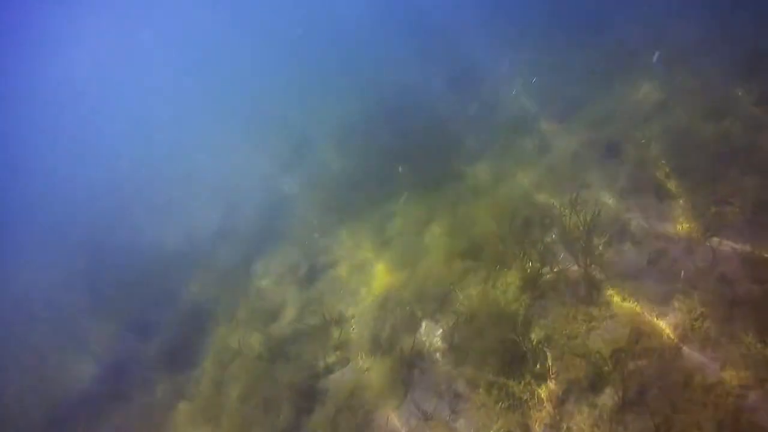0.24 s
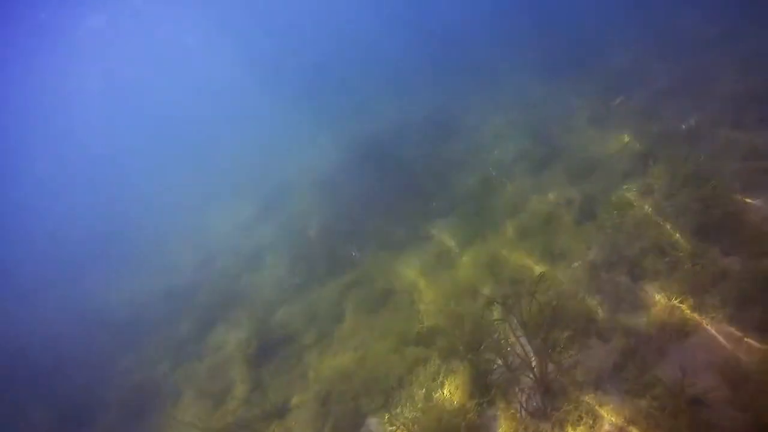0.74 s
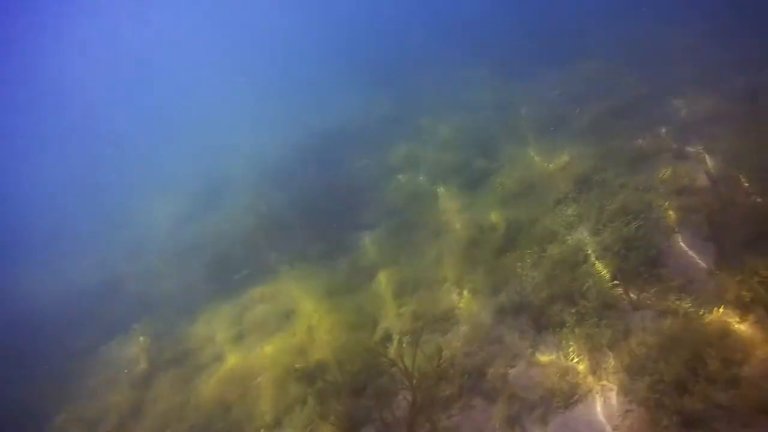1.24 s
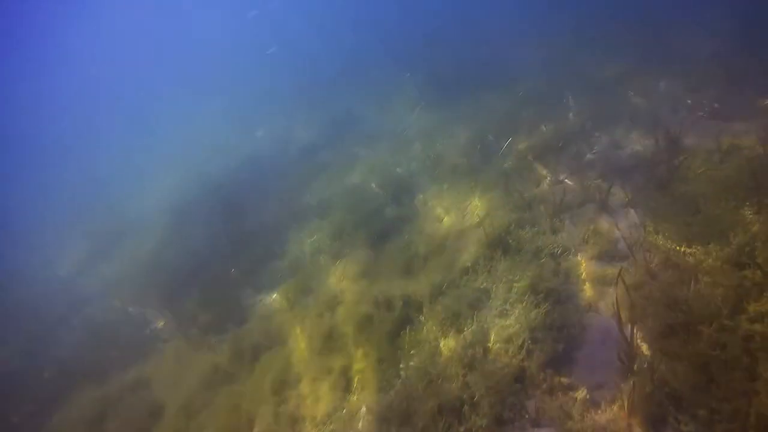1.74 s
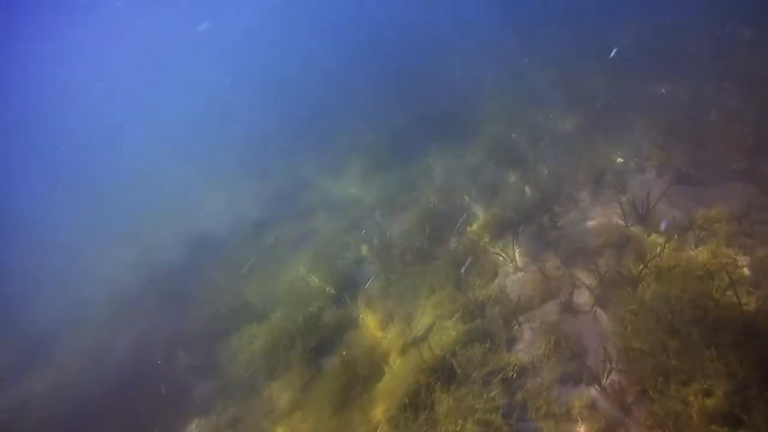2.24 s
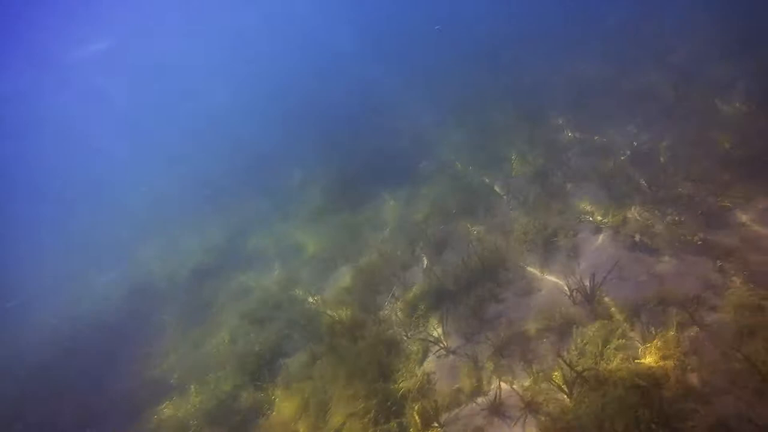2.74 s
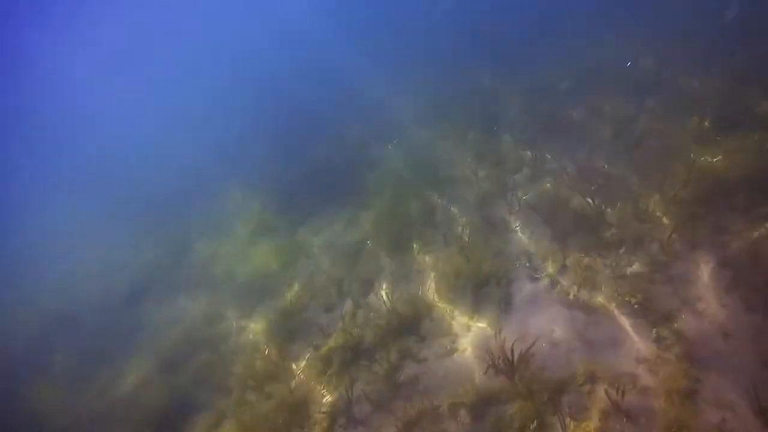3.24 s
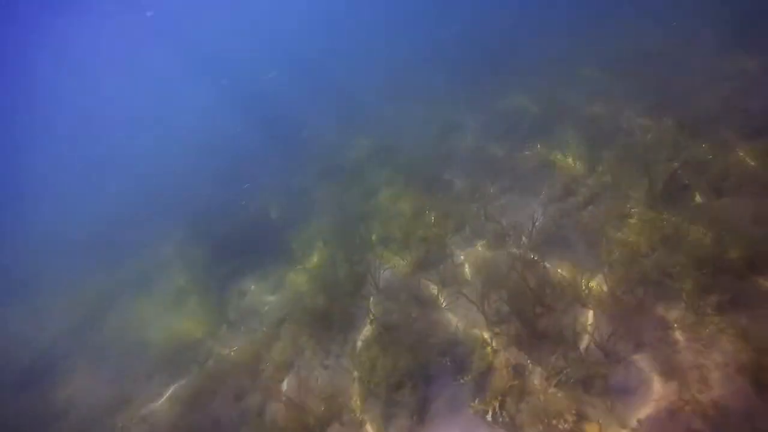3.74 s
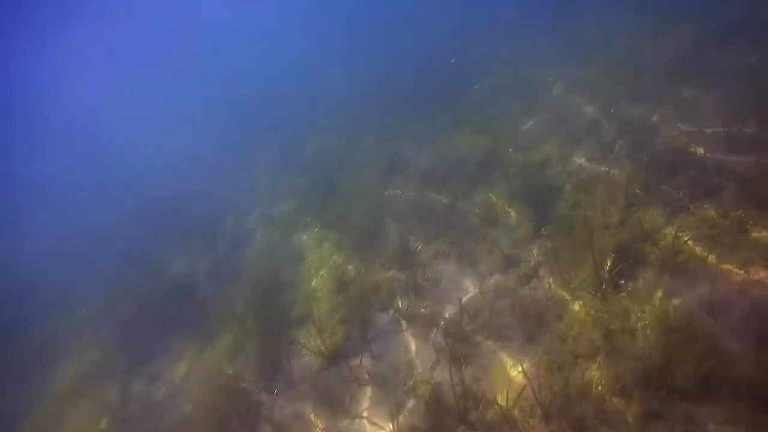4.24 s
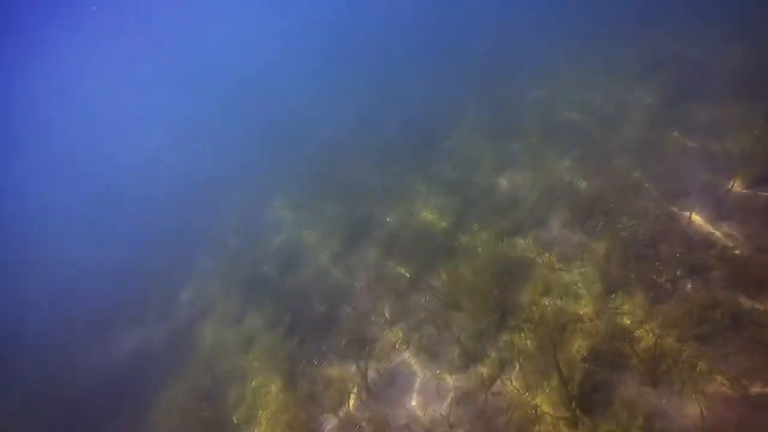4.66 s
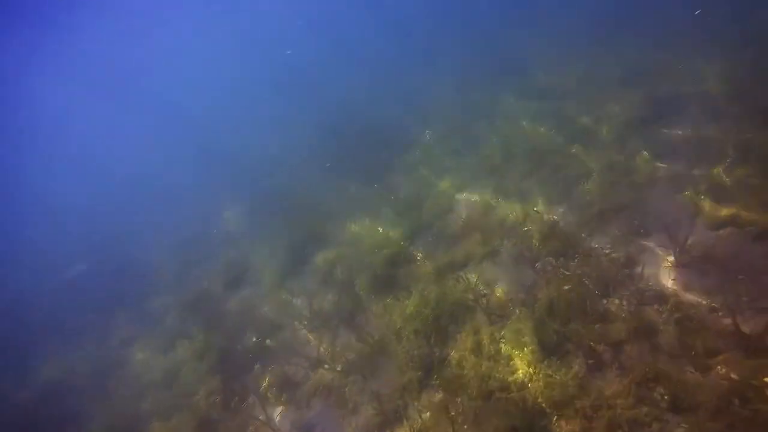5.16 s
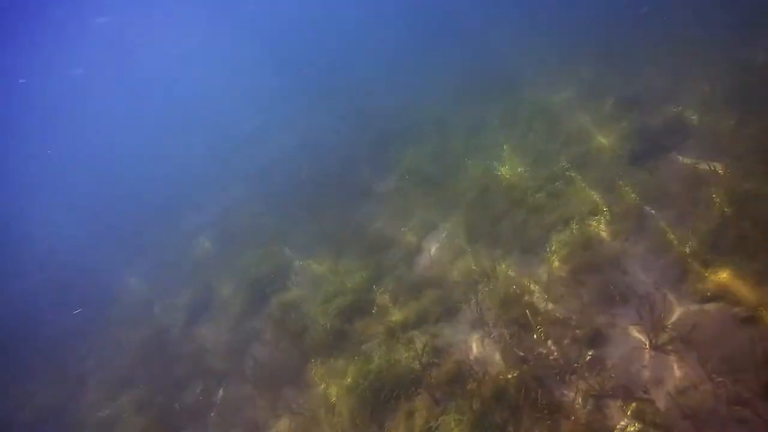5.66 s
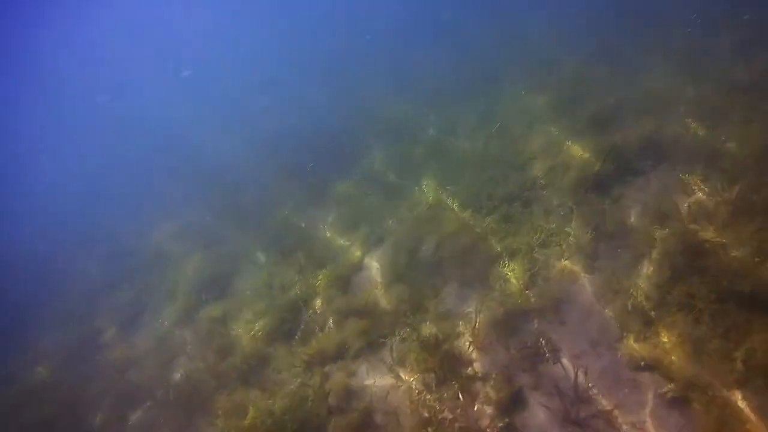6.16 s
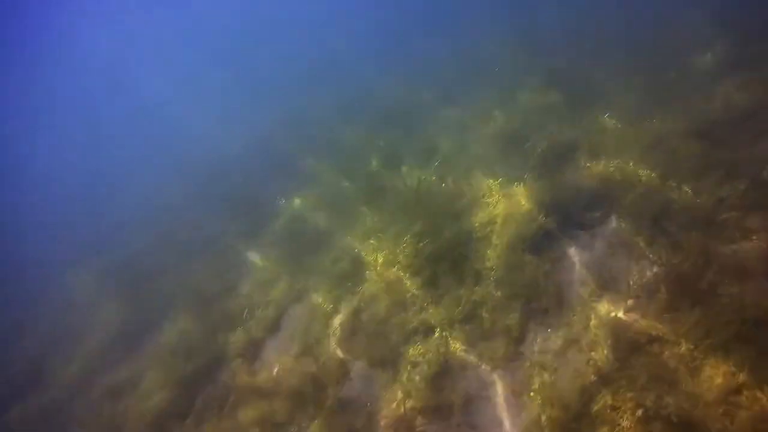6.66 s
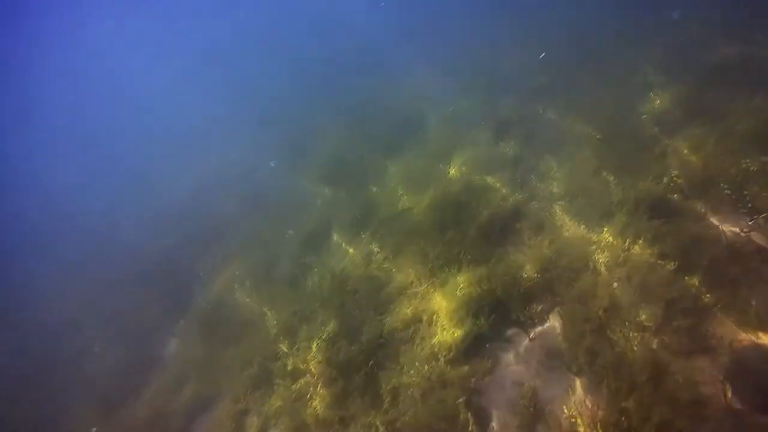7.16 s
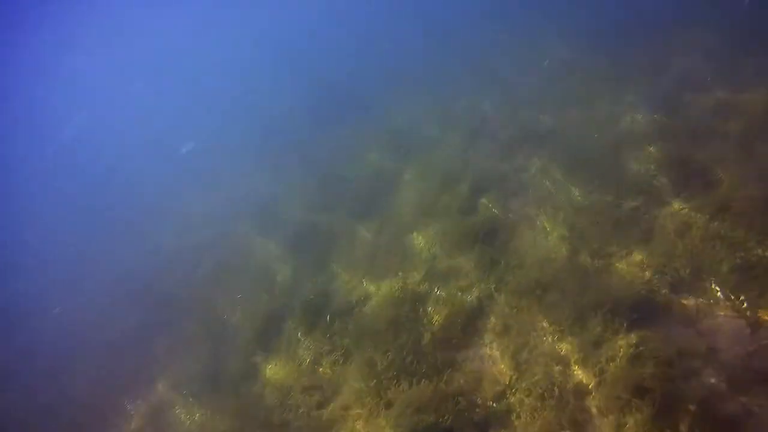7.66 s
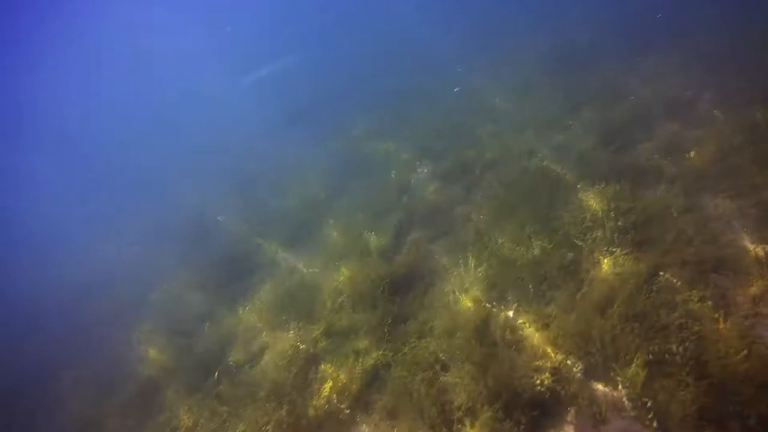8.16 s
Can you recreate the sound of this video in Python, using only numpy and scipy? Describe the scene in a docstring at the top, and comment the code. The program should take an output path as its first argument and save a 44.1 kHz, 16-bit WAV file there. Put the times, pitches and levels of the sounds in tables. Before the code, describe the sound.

Underwater glide: irregular hollow bubble pops and gurgling rush against a closed case, over deep rumble, with scattered soft thumps from the mount.

```python
"""Bubbles burst along the sealed housing of a camera towed under water on a pole below a gliding kayak.
Clear bubbles are single decaying tones, the stream is random births ringing through the case resonances.
Eddies shake pole and mount into a low hum of wandering sine and resonant noise; blows ring both as knocks.
Grit or tiny bubbles tick on the case; the sealed microphone adds a faint noise hiss and two sine whines."""
import sys
import numpy as np
from scipy import signal
from scipy.io import wavfile

SR = 44100
rng = np.random.default_rng(int(sys.argv[2]) if len(sys.argv) > 2 else 0)


def master(y):
    """Save y as 16-bit WAV."""
    cut = np.clip(np.atleast_2d(y).T, -1, 1)
    pcm = np.round(cut * 32767)  # scale
    wavfile.write(sys.argv[1], SR, pcm.astype(np.int16))


N = 370426

# sway of the pole: its one mode
POLE_HZ, POLE_WIDTH_HZ = 29.9, 16.6
# rattle modes of the mount: (frequency [Hz], width [Hz], level [dB])
MOUNT_MODES = [(61.3, 32, -15), (84.7, 17.1, 2.5), (123.2, 21, 4), (144.4, 80, -8.5), (213, 54, -12.5)]
# resonances of housing walls and air pocket: (frequency [Hz], width [Hz], level [dB])
HOUSING_MODES = [(300, 310, -21.5), (410, 37, -9), (510, 48.7, -9), (626, 58.3, -1.5), (931.4, 53.4, -7.5),
                 (1090, 46, -8), (1440, 248, -10.5), (1792, 293, -13.5), (2430, 160, -25),
                 (3050, 540, -26.5), (3810, 1020, -37), (4100, 240, -57.5), (6640, 5000, -48.5),
                 (9050, 3000, -79.5), (12000, 3000, -77.5)]
# clear bubbles: (time [s], level [dB], starting pitch [Hz], 60 dB decay time [ms])
CLEAR_BUBBLES = [(0.03, -22.5, 525, 23), (0.1, -24, 1490, 17), (0.108, -25, 1090, 16),
                 (0.046, -30.5, 410, 42), (0.116, -27, 1390, 120), (0.275, -27.5, 1445, 46),
                 (0.312, -18.5, 627, 69), (0.386, -18.5, 643, 100), (0.404, -19.5, 623, 90),
                 (0.409, -35, 2240, 33), (0.411, -22, 1454, 35), (0.533, -16.5, 1603, 50),
                 (0.592, -40, 3350, 28), (0.609, -21.5, 592, 16), (0.707, -23, 610, 21),
                 (0.812, -20.5, 649, 65), (0.837, -35.5, 2340, 14), (0.926, -44, 3760, 20),
                 (0.929, -18, 582, 194), (0.929, -10, 1501, 37), (0.944, -19.5, 628, 28),
                 (0.946, -11, 1435, 27), (0.967, -40, 3820, 15), (0.967, -24, 638, 150),
                 (1.016, -38, 3420, 13), (1.019, -28, 1460, 18), (1.038, -42, 4630, 8.9),
                 (1.104, -25, 1760, 8.1), (1.138, -26, 620, 29), (1.14, -25.5, 1390, 21),
                 (1.159, -22, 660, 36), (1.193, -16.5, 656, 57), (1.204, -15.5, 1082, 60),
                 (1.204, -28.5, 2950, 20), (1.226, -36, 2880, 14), (1.282, -33, 3170, 19),
                 (1.401, -26, 1875, 23), (1.472, -21.5, 514, 50), (1.483, -28, 410, 180),
                 (1.533, -33.5, 2420, 33), (1.558, -20.5, 1486, 44), (1.609, -27, 366, 140),
                 (1.627, -30.5, 300, 46), (1.629, -19.5, 1447, 48), (1.678, -29, 1330, 26),
                 (1.713, -29, 339.6, 290), (1.717, -17.5, 634, 44), (1.786, -20.5, 1520, 32),
                 (1.789, -22, 570, 48), (1.828, -24.5, 1190, 23), (1.833, -26, 549, 170),
                 (1.956, -27.5, 544, 230), (1.962, -23, 1090, 57), (2.102, -26, 1654, 62),
                 (2.161, -23.5, 1490, 23), (2.192, -25, 1440, 44), (2.194, -19, 733, 25),
                 (2.238, -22, 820, 19), (2.259, -27, 1730, 39), (2.303, -32, 432, 230),
                 (2.324, -27, 1460, 60), (2.432, -32.5, 3120, 15), (2.434, -19, 653, 100),
                 (2.467, -27, 637, 86), (2.528, -21.5, 636, 120), (2.563, -18.5, 596, 53),
                 (2.577, -35.5, 1710, 58), (2.583, -13.5, 614, 7.3), (2.604, -21.5, 404, 7),
                 (2.618, -24, 1083, 81), (2.637, -17, 702, 77), (2.643, -38.5, 2890, 30),
                 (2.657, -16.5, 548, 51), (2.72, -23.5, 1430, 16), (2.74, -21, 677, 130),
                 (2.755, -20.5, 1085, 12), (2.905, -26, 644, 13), (2.913, -27.5, 1090, 79),
                 (2.997, -23, 1360, 9.4), (3.001, -24.5, 977, 30), (3.042, -27.5, 709, 180),
                 (3.07, -30.5, 1457, 130), (3.075, -19, 1830, 21), (3.177, -18.5, 606, 48),
                 (3.184, -26, 1850, 10), (3.243, -25.5, 1185, 17), (3.307, -24, 1475, 49),
                 (3.362, -40.5, 4050, 24), (3.394, -36.5, 3050, 11), (3.565, -17, 623, 9.6),
                 (3.567, -17.5, 910, 127), (3.609, -30.5, 3050, 15), (3.648, -23, 918, 62),
                 (3.648, -17, 1814, 11), (3.679, -20, 1570, 12), (3.681, -38, 3650, 14),
                 (3.682, -24, 907, 69), (3.756, -19.5, 635, 24), (3.758, -30, 1510, 21),
                 (3.762, -15, 920, 59), (3.829, -31, 2400, 16), (3.83, -31, 1420, 22),
                 (3.921, -21, 1550, 12), (3.929, -21, 663, 180), (4.004, -21.5, 700, 84),
                 (4.019, -39, 3530, 16), (4.025, -16.5, 600, 39), (4.026, -23, 1750, 26),
                 (4.041, -30, 2430, 16), (4.047, -25, 1193, 29), (4.091, -21, 634, 59),
                 (4.1, -22.5, 1350, 36), (4.131, -22.5, 1554, 94), (4.322, -21, 847, 41),
                 (4.325, -36, 3230, 14), (4.338, -19.5, 595, 120), (4.372, -12.5, 510, 150),
                 (4.381, -29, 1450, 44), (4.418, -30, 1570, 15), (4.419, -25.5, 1020, 71),
                 (4.466, -25, 956, 18), (4.476, -20.5, 515, 73), (4.476, -19.5, 1840, 5.3),
                 (4.544, -24, 1245, 41), (4.549, -30, 2450, 17), (4.691, -20, 1535, 51),
                 (4.774, -33, 2890, 11), (4.775, -28, 649, 69), (4.859, -33.5, 927, 53),
                 (4.93, -31, 568, 92), (5.021, -40, 1490, 61), (5.108, -35, 1530, 35), (5.13, -33, 700, 30),
                 (5.157, -38.5, 3670, 37), (5.269, -40, 3850, 23), (5.267, -35, 1626, 54),
                 (5.33, -31.5, 917, 180), (5.352, -35, 1540, 40), (5.39, -34, 1530, 71),
                 (5.465, -27.5, 2830, 3.4), (5.465, -31, 633, 37), (5.489, -35, 1445, 70),
                 (5.565, -34.5, 1280, 50), (5.602, -28.5, 1356, 48), (5.672, -24.5, 2494, 17),
                 (5.81, -27, 620, 31), (5.823, -25.5, 1400, 65), (5.888, -26.5, 1430, 46),
                 (5.886, -42, 3350, 25), (5.978, -30, 1605, 28), (5.989, -37, 3060, 20),
                 (6.039, -47, 3120, 5.7), (6.036, -41.5, 4600, 20), (6.067, -26, 922, 103),
                 (6.114, -23, 1370, 37), (6.208, -40, 3630, 10), (6.238, -36.5, 3130, 16),
                 (6.238, -23.5, 932, 120), (6.241, -35, 1420, 55), (6.253, -26, 1330, 16),
                 (6.282, -23, 1440, 19), (6.299, -22, 614, 68), (6.299, -19.5, 1523, 66),
                 (6.306, -19.5, 934, 100), (6.312, -30, 3210, 26), (6.332, -19, 677, 6.7),
                 (6.388, -22, 1650, 12), (6.389, -16.5, 656, 22), (6.438, -13, 660, 17),
                 (6.448, -17.5, 930, 46), (6.479, -40.5, 4700, 13), (6.479, -20, 903, 70),
                 (6.524, -4, 621, 54), (6.584, -24.5, 1880, 13), (6.597, -24, 1412, 57),
                 (6.644, -20.5, 620, 120), (6.677, -27.5, 1365, 60), (6.691, -16, 601, 190),
                 (6.712, -18, 687, 26), (6.77, -19.5, 472, 11), (6.786, -16.5, 641, 89),
                 (6.864, -28.5, 1880, 40), (6.87, -34, 3780, 10), (6.872, -20, 622, 59),
                 (6.906, -21, 412, 98), (7.035, -39, 3540, 25), (7.121, -26, 1400, 46),
                 (7.218, -16.5, 656, 68), (7.267, -31, 3050, 10), (7.278, -16, 642, 50),
                 (7.279, -29, 1390, 19), (7.31, -29.5, 1450, 30), (7.312, -18.5, 617, 47),
                 (7.352, -27, 1490, 20), (7.578, -21, 634, 200), (7.604, -24.5, 605, 55),
                 (7.723, -39, 2900, 16), (7.949, -20, 608, 22), (8.044, -24.5, 1650, 27),
                 (8.272, -19, 687, 95), (8.275, -33, 2510, 14), (8.29, -25, 590, 45)]


def from_db(db):
    """Gain of a level in dB."""
    return 10 ** (np.asarray(db) / 20)


def rms_one(x):
    """Scale to rms 1."""
    return x / np.sqrt(np.mean(x ** 2) + 1e-20)


def in_time(rows):
    """Columns of a breakpoint table, drawn as straight lines with one value a sample."""
    times, *columns = np.transpose(rows)
    return [np.interp(np.arange(N) / SR, times, column) for column in columns]


def drift(rate_hz):
    """Slow random wander of rms 1: noise at every 40th sample through a double one-pole low-pass."""
    r = np.exp(-80 * np.pi * rate_hz / SR)
    noise = rng.standard_normal(N // 40 + 2002)
    slow = signal.lfilter([1], [1, -2 * r, r * r], noise)[2000:]   # drop the run-in
    return np.interp(np.arange(N) / 40, np.arange(len(slow)), rms_one(slow))


def resonance(x, hz, width_hz):
    """Two-pole resonance with a gain of about 1 on top."""
    r = np.exp(-np.pi * width_hz / SR)
    feedforward = [(1 - r * r) / 2, 0, (r * r - 1) / 2]
    feedback = [1, -2 * r * np.cos(2 * np.pi * hz / SR), r * r]
    return signal.lfilter(feedforward, feedback, x + 1e-18)


def body(x, modes):
    """Resonances in parallel, signs alternating."""
    return sum((-1) ** k * from_db(db) * resonance(x, hz, width_hz)
               for k, (hz, width_hz, db) in enumerate(modes))


def hum():
    """The pole swings at a wandering pitch; eddy noise adds to it and drives the mount modes."""
    # eddies shaking the mount: (time [s], pole sway level [dB], mount rattle level [dB])
    shake = [(0.0, -17.5, -22.5), (0.07, -25, -36), (0.33, -37, -38.5), (0.77, -33, -48),
             (0.93, -34, -34.5), (1.0, -24.5, -35), (1.39, -37, -36.5), (1.45, -12, -28), (1.55, -25, -28),
             (1.61, -18.5, -33), (1.82, -33, -29), (1.89, -22, -43), (2.15, -38, -35), (2.46, -36, -39),
             (2.52, -28, -34), (3.0, -34, -37), (3.58, -31.5, -34), (3.72, -33.5, -38.5), (3.9, -28, -33),
             (4.26, -26.5, -40), (4.36, -28, -36), (4.6, -36.5, -36.5), (4.89, -37, -42.5),
             (5.12, -28.5, -47), (5.92, -36.5, -46), (6.64, -21.5, -34), (6.87, -25.5, -37),
             (7.42, -33, -38.5), (8.26, -30, -34), (8.4, -19, -26.5)]
    sway_db, rattle_db = in_time(shake)
    eddies = rng.standard_normal((2, N + SR))   # one second of run-in
    swing_hz = POLE_HZ * (1 + 0.15 * drift(5.56))
    swing = np.sqrt(2) * np.sin(2 * np.pi * np.cumsum(swing_hz) / SR)
    buffet = resonance(eddies[0], POLE_HZ, POLE_WIDTH_HZ)
    buffet = resonance(buffet, POLE_HZ, 42.0)[SR:]
    sway = from_db(sway_db) * (swing + 0.75 * rms_one(buffet))
    dull = signal.butter(2, 260.0, fs=SR, output="sos")
    rattle = signal.sosfilt(dull, body(eddies[1], MOUNT_MODES))[SR:]
    return sway + from_db(rattle_db + 2.9 * drift(9.6)) * rms_one(rattle)


def stream_levels():
    """Level of each bubble size, largest first; small and tiny bubbles follow the middle ones."""
    # bubble stream: (time [s], large bubble level [dB], glug level [dB], middle bubble level [dB])
    stream_curve = [(0.0, -35.5, -49, -34.5), (0.68, -43.5, -61, -50), (0.84, -47.5, -70, -42),
                    (1.05, -35, -63, -41), (1.42, -37.5, -61, -42), (1.64, -39.5, -43.5, -36.5),
                    (1.94, -37.5, -45.5, -38), (2.22, -38, -49, -43.5), (2.55, -28.5, -47.5, -37.5),
                    (2.78, -36, -49, -39.5), (3.02, -35.5, -53.5, -38.5), (3.72, -39, -55, -38.5),
                    (3.95, -34.5, -63.5, -39), (4.19, -38, -52.5, -39), (4.42, -39.5, -56, -34),
                    (4.56, -39, -48.5, -41), (4.91, -46.5, -60, -46.5), (6.01, -43.5, -75, -51.5),
                    (6.25, -41.5, -60, -38.5), (6.46, -45.5, -55, -34.5), (6.83, -34, -55, -42.5),
                    (7.16, -34, -53.5, -42), (7.44, -33.5, -55.5, -42), (7.98, -46, -62.5, -42.5),
                    (8.24, -35, -48.5, -38.5), (8.4, -36.5, -68, -44.5)]
    large_db, glug_db, middle_db = in_time(stream_curve)
    mean_db = middle_db.mean()
    swing_db = middle_db - mean_db
    small_db = mean_db - 15 + 0.34 * swing_db
    tiny_db = mean_db - 33.5 + 0.2 * swing_db
    return [glug_db, large_db, middle_db, small_db, tiny_db]


def break_ups():
    """An air pocket breaks up: a sudden rise, dying away, that makes births of all sizes likelier."""
    per_s, decay_ms, boost = 16.0, 6.0, 4.0
    clear_strength = 0.74   # break-up that comes with each clear bubble
    breaks = (rng.random(N) < per_s / SR) * rng.exponential(1, N)
    breaks[(np.array(CLEAR_BUBBLES)[:, 0] * SR).astype(int)] += clear_strength
    fade = np.exp(-1000 / (decay_ms * SR))
    return signal.lfilter([boost], [1, -fade], breaks + 1e-18)


def stream():
    """Random births in clumps ring at pitches spread over each size, over turbulence, through the housing."""
    # bubble sizes, largest first: (low edge [Hz], high edge [Hz], birth rate before clumping [1/s],
    # ring length before random damping [cycles], size spread [dB], turbulence relative to rings [dB])
    bubble_sizes = [(206, 450, 35, 18, 0.5, -19), (448, 774, 115, 21.7, 3.5, -7),
                    (820, 2303, 170, 28.2, 3, -9), (2387, 5400, 200, 27, 7, -9.5),
                    (4720, 10500, 190, 30, 5, -5)]
    turbulence_burst = 0.2   # share of a break-up heard as plain turbulence
    out, clumps, bursts = np.zeros(N), drift(8.2), break_ups()
    for level_db, row in zip(stream_levels(), bubble_sizes):
        low_hz, high_hz, per_s, cycles, spread_db, plain_db = row
        strength = from_db(spread_db * np.minimum(rng.exponential(1, N), 3))
        strength = strength * rng.choice([-1, 1], N)
        density_db = 3.0 * clumps + .4 * (level_db - level_db.mean())   # sparser in lulls
        born = rng.random(N) < per_s * (.6 + bursts) * from_db(density_db) / SR
        births = strength * born
        dealt = rng.integers(0, 14, N)   # which of the 14 pitches a birth takes
        pitches = np.geomspace(low_hz, high_hz, num=14)
        damping = from_db(3.7 * rng.uniform(-1.76, 1, 14))   # some pitches ring longer
        rings = np.zeros(N)
        for k, hz in enumerate(pitches):
            ring = resonance(births * (dealt == k), hz, 1.07 * hz / cycles * damping[k])
            rings += resonance(ring, hz, 1.7 * hz)   # wider resonance rounds the onset
        band = signal.butter(2, [low_hz, high_hz], "band", fs=SR, output="sos")
        plain = signal.sosfilt(band, rng.standard_normal(N))
        plain *= from_db(2.0 * clumps + 2.0 * drift(24.0)) * (1 + turbulence_burst * bursts)
        housed_rings = rms_one(body(rings, HOUSING_MODES))
        housed_plain = rms_one(body(plain, HOUSING_MODES))
        out += from_db(level_db) * (housed_rings + from_db(plain_db) * housed_plain)
    return out


def electronics():
    """Preamp hiss is low-passed noise; two thin sine whines waver slightly in pitch and level."""
    # camera electronics: (frequency [Hz], wander [Hz], mean level [dB])
    whine_rows = [(11294, 30, -94), (13620, 7, -90)]
    hiss = signal.lfilter([1], [1, -.7], rng.standard_normal(N))
    out = from_db(-72) * rms_one(hiss)
    for hz, wander_hz, db in whine_rows:
        level = np.sqrt(2) * from_db(db + 4.5 * drift(30.0))
        pitch_hz = hz + wander_hz * drift(20.0)
        out += level * np.sin(2 * np.pi * np.cumsum(pitch_hz) / SR)
    return out


def clear_bubbles(glide=0.005):
    """Each clear bubble swells, then rings down as its pitch creeps up; its birth cracks and thuds the case."""
    swell_scale_ms, swell_per_octave = 5.41, 0.608   # scale at 630 Hz; its share left an octave higher
    thud_hz, thud_width_hz, thud_db = 300, 230, 21.5
    out, cracks, thuds = np.zeros(N + SR), np.zeros(N), np.zeros(N)
    signs = rng.choice([-1, 1], len(CLEAR_BUBBLES))
    for (s, db, hz, t60_ms), sign in zip(CLEAR_BUBBLES, signs):
        octaves = np.log2(hz / 630)
        swell_ms = swell_scale_ms * swell_per_octave ** octaves
        swell, t60 = max(swell_ms, .2) / 1000, max(t60_ms, 4.0) / 1000
        t = np.arange(int((1.4 * swell + t60) * SR)) / SR
        rise = np.sin(np.pi / 2 * np.minimum(t / (0.89 * swell), 1)) ** 2
        decay = from_db(-60 * np.maximum(t - 1.26 * swell, 0) / t60)
        tone = np.sin(2 * np.pi * hz * t * (1 + glide * t / t60))
        at = max(round((s - 0.3705 * swell) * SR), 0)   # the listed time falls within the swell
        out[at:at + len(t)] += sign * from_db(db) * rise * decay * tone
        # slow or large births crack less
        cracks[at] += sign * from_db(0.77 * db + 11.0 - 3.9 * swell_ms + 13.5 * octaves)
        # births near 520 Hz thud the wall most
        thuds[at] += sign * from_db(db + thud_db - 13.0 * abs(np.log2(hz / 520)))
    thud = resonance(thuds, thud_hz, thud_width_hz)
    thud = resonance(thud, thud_hz, 2 * thud_width_hz)
    soften = signal.butter(4, 5000.0, fs=SR, output="sos")
    crack = body(signal.sosfilt(soften, cracks), HOUSING_MODES)
    return out[:N] + thud + crack


def ticks():
    """Grit or tiny bubbles tick on the case: a click through a narrow, then a broad resonance."""
    # ticks: (time [s], peak level [dB], centre frequency [Hz])
    tick_rows = [(0.6085, -47, 6700), (0.867, -48, 6200), (0.9179, -50.5, 6190), (1.071, -46.5, 5850),
                 (3.153, -51, 6130), (3.4581, -58, 7600), (3.5165, -49, 9540), (3.647, -47.5, 6360),
                 (5.489, -47.5, 6460), (5.9767, -46, 6300), (6.0362, -40, 5000), (6.0743, -51, 7260),
                 (6.2188, -46, 8100), (6.2527, -55, 6870), (6.9565, -47, 8400), (7.1168, -50, 6950),
                 (7.244, -50, 8100)]
    out = np.zeros(N)
    for s, db, hz in tick_rows:
        click = np.zeros(400)
        click[0] = 1
        ring = resonance(click, hz, 0.035 * hz)
        ring = resonance(ring, hz, .5 * hz)
        at = round(s * SR)
        out[at:at + 400] += from_db(db) * ring / np.abs(ring).max()
    return out


def knocks():
    """A soft raised-cosine blow rings the mount modes and swings the pole."""
    # knocks on the mount: (time [s], blow level [dB], pole share relative to blow [dB], blow length [ms])
    knock_rows = [(0.922, -43, 0, 2.3), (1.406, -8, -11.5, 5.9), (1.563, -16, -23, 5.3),
                  (2.292, -21, -35, 1.2), (2.894, -20.5, -19, 5.7), (2.994, -33, -2, 4.4),
                  (3.751, -23, -25, 2.2), (4.021, -26, -22, 2.6), (4.337, -19, -18, 5.1),
                  (6.453, -16, -32.5, 2.5), (7.937, -23.5, -17, 5.7), (8.268, -5.5, -44, 2.6),
                  (8.284, -7.5, -28, 1.16), (8.316, -12.5, -24, 4.0)]
    mount, pole = np.zeros(N), np.zeros(N)
    for s, db, sway_db, length_ms in knock_rows:
        start = round(s * SR)
        blow = np.hanning(max(int(length_ms * SR / 1000), 8))[:N - start]
        blow = blow / blow.sum()
        at = slice(start, start + len(blow))
        mount[at] -= from_db(db) * blow
        pole[at] -= from_db(db + sway_db) * blow
    mount_ring = from_db(48.5) * body(mount, MOUNT_MODES)
    return mount_ring + from_db(66) * resonance(pole, POLE_HZ, 34.0)


def scene():
    """Everything reaches one microphone."""
    mix = hum() + stream() + electronics() + clear_bubbles() + ticks() + knocks()
    return mix[None]


def record(dry):
    """A 3 ms fade in; deep bass rolls off, the top is cut steeply."""
    dry = dry * np.minimum(np.arange(N) / (.003 * SR), 1)
    bass_cut = signal.butter(2, 18.0, "high", fs=SR, output="sos")
    top_cut = signal.cheby2(24, 60, 15300, fs=SR, output="sos")   # 60 dB down from 15300 Hz
    return signal.sosfilt(top_cut, signal.sosfilt(bass_cut, dry))


dry = scene()
out = record(dry)
master(out)
```